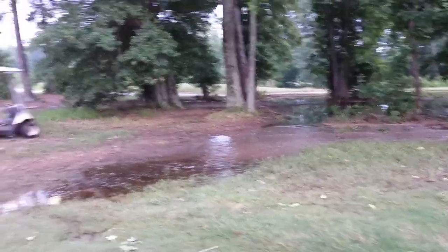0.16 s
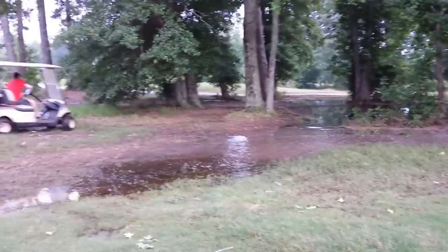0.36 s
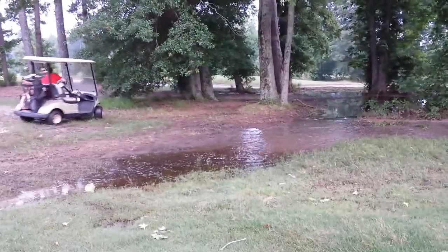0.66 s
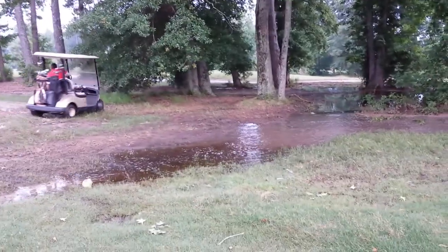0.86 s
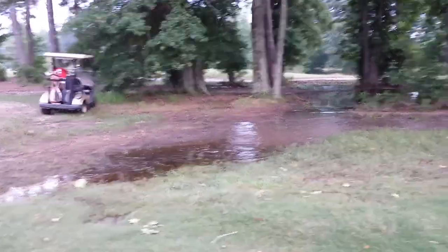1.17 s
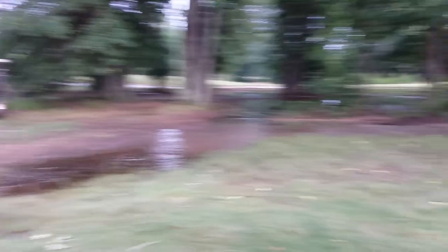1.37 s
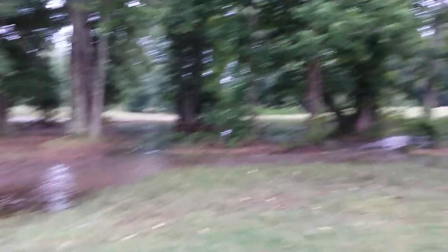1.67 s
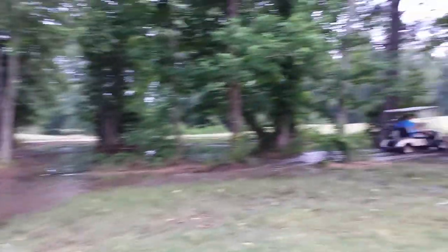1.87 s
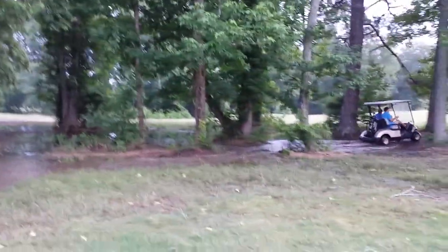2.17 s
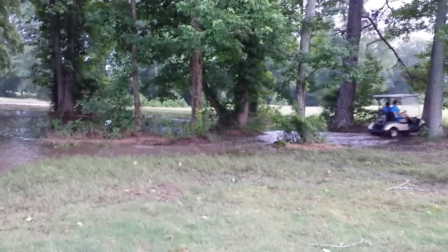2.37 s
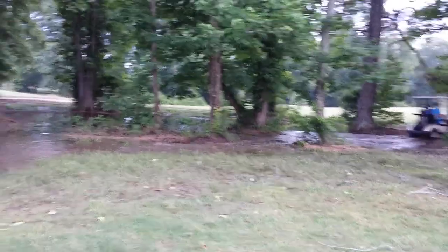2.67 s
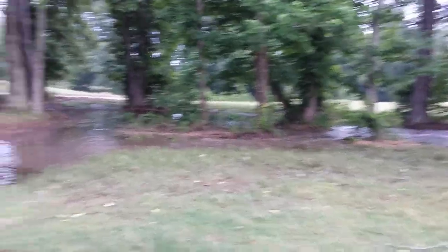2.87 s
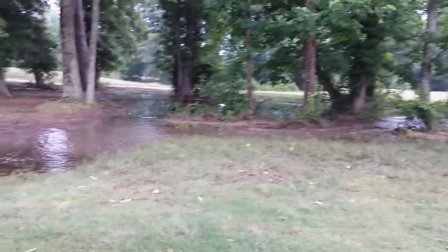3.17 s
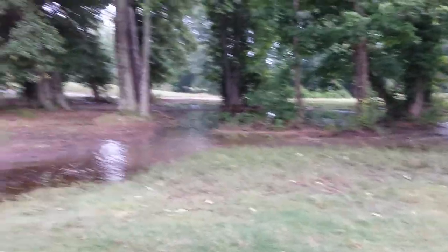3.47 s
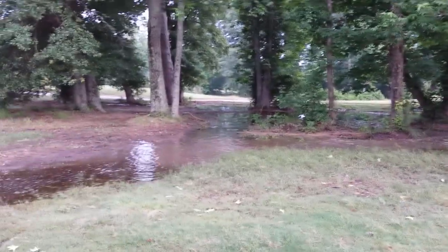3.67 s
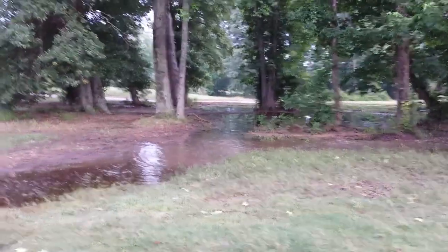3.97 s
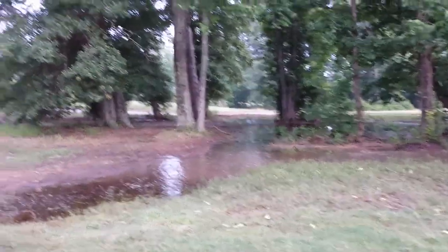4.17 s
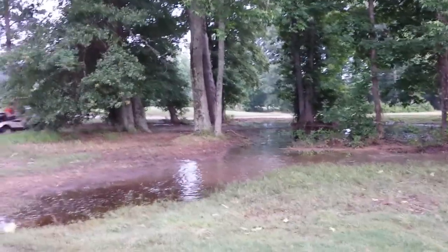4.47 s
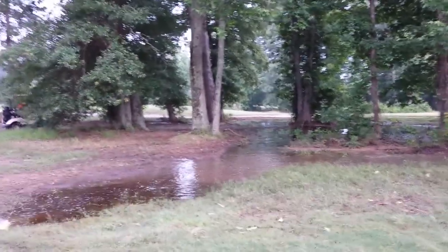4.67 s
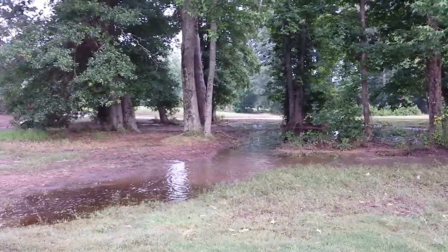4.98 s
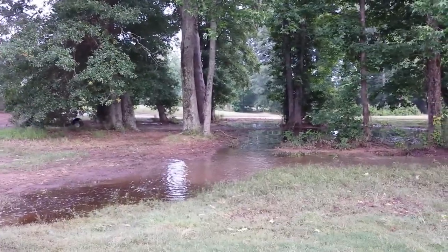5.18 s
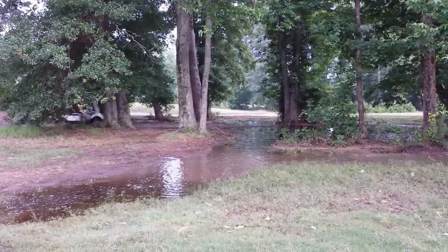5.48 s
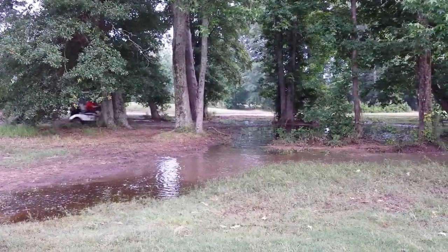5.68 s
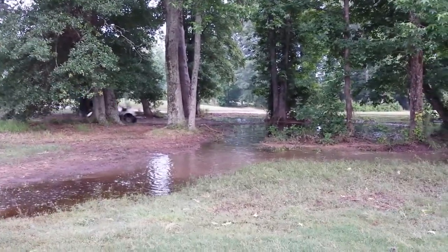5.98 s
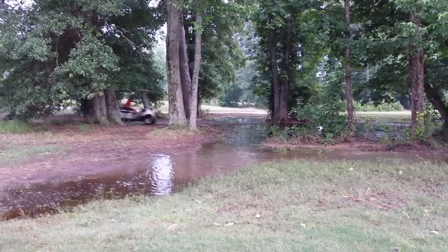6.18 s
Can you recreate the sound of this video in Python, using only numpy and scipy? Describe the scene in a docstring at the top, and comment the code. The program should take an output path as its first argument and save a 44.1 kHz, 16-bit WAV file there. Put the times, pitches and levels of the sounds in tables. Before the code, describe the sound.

Outdoors among trees, a small single-cylinder petrol cart putters at about twenty beats a second, swelling and easing as the pedal is pressed and released. Its loose cover rattles around one to two seconds. A second, more distant cart chugs and briefly whines behind it. Wet hiss runs throughout, stronger at first, with a slosh of water near two seconds. Close to the handheld stereo microphone come bright ticks, dry rustles and tiny drops.

```python
"""Two petrol carts on wet ground

Two golf carts drive among trees, heard across a puddle; each single-cylinder engine fires about
twenty times a second. Firing pulses and gas noise excite body resonances; noise tails scatter the beats.
Filtered noise makes the wet hiss and wash; short bursts and decaying tones make ticks, rustles, drops
and a clink. Two microphone ports colour the treble differently."""
import sys
import numpy as np
from scipy import signal
from scipy.fft import rfft, irfft
from scipy.io import wavfile
from scipy.ndimage import uniform_filter1d, map_coordinates

SR = 44100
rng = np.random.default_rng(int(sys.argv[2]) if len(sys.argv) > 2 else 0)


def dump(signal):
    """Clip the signal to [-1, 1] and save it as 16-bit WAV at the path in sys.argv[1]."""
    limited = np.clip(np.atleast_2d(signal).T, -1, 1)
    pcm = np.round(limited * 32767).astype(np.int16)
    wavfile.write(sys.argv[1], SR, pcm)


N = 279153
T = np.arange(N) / SR
FREQ_HZ = np.maximum(np.arange(N // 2 + 1) * SR / N, 1)

# Levels are set ahead of the ports; resonance widths are nominal.
# first cart: (time [s], firing rate [Hz])
FIRING_NEAR = [(0.0, 20.92), (0.75, 16.99), (1.15, 20.61), (1.9, 23.45), (3.3, 16.79), (4.7, 21.83),
               (5.45, 24.52), (5.75, 20.9), (6.33, 25.47)]
# first cart's pedal presses: (start [s], length [s], release [s], lowest putt pitch [Hz],
#  bark drive [dB], rasp drive [dB], whine drive [dB])
PEDAL_PRESSES = [(-.3, 0.47, 0.12, 242, -29, -37, -44), (0.38, 1.36, 0.17, 230, -25.5, -32.5, -42.5),
                 (1.987, 0.75, 0.19, 315, -56, -39.5, -46), (2.835, 0.29, .08, 227, -31, -46, -59),
                 (3.535, 0.597, 0.062, 230, -34.5, -37.5, -47),
                 (4.358, 1.19, 0.023, 263.7, -31.5, -46, -48), (5.93, .5, .17, 228, -46, -46, -68)]
# pedal up: (bark drive [dB], rasp drive [dB], whine drive [dB])
IDLE_DRIVE_DB = (-41.5, -47.5, -75)
# silencer and body resonances: (centre [Hz], width [Hz], relative level [dB])
SILENCER_NEAR = [(41.6, 5.2, -8), (100, 27, -5), (110.7, 30, -2.5), (190, 26, -2), (226.5, 59, 4.5),
                 (277, 56, 4.5)]
# engine bay resonances: (centre [Hz], width [Hz], relative level [dB])
BAY_NEAR = [(485, 250, -7), (629, 75, 5), (797, 103, 5), (874, 96, 9), (1140, 390, -5), (1424, 24, -2),
            (1557, 120, 0), (2700, 690, -25)]
# rasp drift of both carts as they turn and move: (time [s], frequency ratio [1])
RASP_RATIO = [(0, 1), (1.6, 0.96), (2.7, 0.98), (4.2, .97), (6.33, 0.82)]
# engine cover resonances: (centre [Hz], width [Hz], relative level [dB])
COVER_MODES = [(2183, 46, 20.5), (2330, 130, -25), (2500, 86, -10)]
# cover's lower knock on each stroke: (centre [Hz], width [Hz], relative level [dB])
COVER_KNOCK_MODES = [(610, 150, 0), (850, 200, 1), (1170, 100, -8), (1400, 150, -4)]
# cover rattles under load: (start [s], length [s], level [dB])
COVER_RATTLES = [(.88, .35, -45), (1.08, .53, -33), (1.51, .45, -35)]
# first cart's early panel knocks: (time [s], onset level [dB])
PANEL_KNOCKS = [(0.569, -33), (0.63, -30), (0.914, -29), (.965, -32)]
# panel shaken by the engine: (centre [Hz], width [Hz], relative level [dB])
PANEL_MODES = [(1415, 85, 5.5), (1610, 180, -23), (2170, 86, -2.5)]
# second cart: (time [s], mean firing rate [Hz])
FIRING_DISTANT = [(0, 16.5), (2.0, 25.8), (2.7, 22.3), (3.4, 24.9), (6.33, 21.4)]
# second cart in the wood: (time [s], bark [dB], boom [dB], rasp [dB], pipe drone [dB])
LEVELS_DISTANT = [(0, -36, -33.5, -29, -40), (.4, -31, -36, -32.5, -32), (1.4, -28.5, -35.5, -35, -34.5),
                  (2.1, -34, -38, -31, -31.5), (2.45, -33.5, -41, -33, -35.5),
                  (3.05, -30, -32.5, -34.5, -35.5), (3.4, -34.5, -34, -37, -41),
                  (4.4, -33.5, -38, -38, -47), (5.2, -32.5, -41.5, -42, -45.5),
                  (5.8, -38, -39, -46.5, -48.5), (6.33, -31, -38, -38, -50)]
# second silencer and body resonances: (centre [Hz], width [Hz], relative level [dB])
SILENCER_DISTANT = [(47, 10, -9), (92.8, 26.6, 0), (141.4, 17.6, 4), (219.7, 63, 4.5), (266.8, 78, -0.5),
                    (364.7, 36, -7.5)]
# second engine bay resonances: (centre [Hz], width [Hz], relative level [dB])
BAY_DISTANT = [(579, 214, -2.5), (646, 133, -4.5), (755, 136, -11), (950, 65, 0), (1297, 334, -9.5),
               (1432, 240, -9.5), (2360, 450, -10.5), (2720, 150, -6)]
# second tailpipe drone: (centre [Hz], width [Hz], relative level [dB])
TAILPIPE_DISTANT = [(298, 45, -4), (332, 30, 0), (378, 30, -11)]
# second cart's drive whine: (time [s], mean pitch [Hz], level [dB])
WHINE_DISTANT = [(2.15, 880, -75), (2.3, 885, -44), (2.6, 905, -42), (2.75, 1000, -39.5), (2.85, 990, -46),
                 (3.15, 1005, -47), (3.35, 960, -80)]
# thin squeaks: (start [s], length [s], mean pitch [Hz], level [dB])
SQUEAK_TONES = [(3.95, .17, 2815, -43.5), (3.955, .05, 6380, -38), (4.32, .09, 6390, -42),
                (4.49, .14, 6400, -37)]
# close ticks, like drops and twigs: (time [s], peak [dB], ring [Hz], bright snap re ring [dB])
TICK_EVENTS = [(.064, -18, 6250, -6), (.106, -14, 4040, -16), (.225, -7.5, 5750, -24),
               (.324, -11, 5700, -28), (.453, -14, 6800, -12), (1.592, -16.5, 5445, -20),
               (2.081, -22, 4300, -8), (2.547, -13.5, 7000, 7), (2.591, -12, 7000, 4),
               (2.759, -17, 7500, -3), (2.777, -18, 7600, -4), (2.845, -17, 5300, -14),
               (2.98, -16, 6000, 3), (3.111, -11, 6500, -4), (3.168, -13, 7040, 2), (3.182, -10, 6500, 5),
               (3.296, -15, 5250, -2), (3.384, -18, 5600, 4), (3.403, -19, 6500, 4),
               (3.434, -21, 5800, -20), (3.443, -19, 4600, -10), (3.696, -14, 5400, 5),
               (3.851, -14.5, 6300, 4), (4.655, -18, 7000, 3), (4.968, -10.5, 9000, -1),
               (5.51, -18, 6600, 2), (5.88, -19, 6400, -1), (6.112, -20, 6500, 2)]
# close crackling rustles: (time [s], peak [dB])
RUSTLE_EVENTS = [(1.772, -10), (1.8, -13), (1.895, -13), (2.152, -13), (2.733, -17), (3.705, -18),
                 (4.04, -18.5), (4.297, -16), (4.5, -17), (4.976, -12), (5.514, -21)]
# drops with a thin pitched tail: (time [s], peak [dB], pitch [Hz])
PLINK_EVENTS = [(.232, -19, 5840), (.327, -17.5, 4730), (3.3, -18.5, 4850)]
# metallic clink modes: (pitch [Hz], relative level [dB], T60 [s])
CLINK_MODES = [(4424, 0, .1), (4974, -21, .1), (6282, -22, .15)]
# wet ground under the tyres: (time [s], hiss before gain [dB], spray before gain [dB])
WET_LEVELS = [(0.0, -28, -40), (0.39, -27, -37.5), (0.58, -27, -35), (1.66, -25.5, -36), (1.97, -28, -34),
              (2.27, -33.5, -40.5), (3.01, -32, -43), (3.45, -35.5, -50), (3.98, -32.5, -44),
              (5.08, -35, -51.5), (5.4, -32.5, -51), (5.73, -37.5, -54), (6.33, -31, -46)]
# wet hiss spectrum: (frequency [Hz], relative level [dB])
HISS_COLOUR = [(100, -2.5), (900, 1), (1800, -4), (3000, 3), (4500, 1.5), (7000, 3), (9000, -4),
               (11000, -25.5), (15000, -5)]
# microphone port responses: (frequency [Hz], left [dB], right [dB])
PORT_RESPONSE = [(1460, 0, -0.5), (2110, 3.5, -0.5), (3080, -2.5, -3.5), (4100, 3, -2), (5330, 10.5, -1),
                 (6100, 10.5, -11), (6220, 12, -7.5), (7030, 5, -10.5), (7860, 1, -1.5), (10300, 0, 2.5),
                 (12200, -9, -1), (13500, -31, -9.5), (14800, -47, -37)]

ATTACK_S = 0.34  # engine takes up load
BOOM_DB, BOOM_PER_BARK_DB = -22, 0.46  # boom = base + share of the bark drive
BROAD_BARK_DB = -8.5  # re bark drive
CHAMBER_HZ, CHAMBER_SAG_S, CHAMBER_BUILD_DB = 360, .8, 2
CHAMBER_DB, PUTT_PEAK_S = -1, .0085  # chamber level re bark drive
WHINE_HZ, WHINE_WIDTH_HZ = 1396, 40
WHINE_ATTACK_S, WHINE_RELEASE_S = 0.18, 0.17  # drive runs on as the cart coasts
RATTLE_BASE_HZ, RATTLE_HZ_PER_FIRING_HZ, RATTLE_WANDER_RATIO = 1020, 55, .02
RATTLE_FADE_S, RATTLE_SCATTER_DB, COVER_KNOCK_DB = .11, 1.6, -7.5
BOUNCE_S, BOUNCE_DB, BOUNCE_SCATTER_DB = .012, -8, 4  # cover's second ring
FAR_HUNT_RATIO = .025  # second engine's governor hunts
SQUEAK_WAVER_RATIO = .005
TICK_WIDTH_HZ, TICK_T60_S, SNAP_T60_S = 900, .022, .008
TICK_TAIL_DB, TICK_TAIL_T60_S = -32, 0.63
RUSTLE_HZ, RUSTLE_WIDTH_HZ, RUSTLE_BRIGHT_DB, RUSTLE_T60_S = 6870, 2500, -1, 0.42
CRACKLES_PER_S, CRACKLE_T60_S, CRACKLE_BED = 220, .008, .22
PLINK_WIDTH_HZ, PLINK_T60_S = 220, .12
CLINK_S, CLINK_DB = 2.082, -16
DROPS_PER_S, DROP_DB, DROP_SCATTER_DB, DROP_T60_S = 22, -42, 3.5, .011
HISS_GAIN_DB, SPRAY_GAIN_DB = -0.36, 4
WASH_S, WASH_LENGTH_S, WASH_FADE_S, WASH_DB = 1.71, 1.67, 0.25, -41
WASH_HZ, WASH_WIDTH_HZ, WASH_GURGLE_DB = 2920, 1100, 2.3
TOP_HZ = 14800


def first_cart():
    """Firings thump the silencer, gas rasps in the engine bay, the drive whines and the cover rattles."""
    firing_hz, = curves(FIRING_NEAR)
    bark_db, rasp_db, whine_db = pedal_levels()
    boom_db = BOOM_DB + BOOM_PER_BARK_DB * bark_db
    pulses, age_s, size = firings(firing_hz, scatter_db=.8, jitter_cycles=.008)
    gas = size * puff(age_s, decay_s=.016, leak=.3)
    # a weaker gulp of air half a cycle later
    intake = np.diff(1.0 * (age_s * firing_hz > .5), prepend=0).clip(0)
    thump = unit(ring(pulses + .3 * intake, SILENCER_NEAR))
    thump = thump + .5 * unit(ring(gas, SILENCER_NEAR))
    flow = stroke(age_s, rise_s=.004, decay_s=.014, leak=.16)
    rasp = gas_rasp(BAY_NEAR, size * flow)
    whine = unit(ring(puff(age_s, decay_s=.015, leak=.9), [(WHINE_HZ, WHINE_WIDTH_HZ, 0)]))
    chug = exhaust(thump, bark_db + BROAD_BARK_DB, boom_db)
    putt = chamber(age_s, size) * undb(bark_db + CHAMBER_DB)
    body = chug + putt + rasp * undb(rasp_db) + whine * undb(whine_db)
    cover = cover_rattle(age_s, firing_hz)
    body_heard = among_trees(body, lag_ms=.17, scatter_db=-13, t60_s=.35)
    return body_heard + among_trees(cover, lag_ms=.17, scatter_db=-16, t60_s=.15)


def pedal_levels():
    """Bark, rasp and whine drive [dB]: press powers add to idle power."""
    power = undb(IDLE_DRIVE_DB)[:, None] ** 2 * np.ones(N)
    for start_s, length_s, release_s, _, *drive_db in PEDAL_PRESSES:
        load = press(start_s, length_s, ATTACK_S, release_s)
        roll = press(start_s, length_s, WHINE_ATTACK_S, WHINE_RELEASE_S)
        power = power + (undb(drive_db)[:, None] * np.array([load, load, roll])) ** 2
    return 10 * np.log10(power)


def press(start_s, length_s, attack_s, release_s):
    """Load builds exponentially from the press and dies away after release."""
    build = 1 - np.exp(-np.maximum(T - start_s, 0) / attack_s)
    return build * np.exp(-np.maximum(T - start_s - length_s, 0) / release_s)


def chamber(age_s, size):
    """Each firing rings the silencer chamber in one putt, lower and fuller with time since the press."""
    starts_s, _, _, lowest_hz, *_ = np.transpose(PEDAL_PRESSES)
    latest = np.searchsorted(starts_s, T) - 1
    load = np.minimum((T - starts_s[latest]) / CHAMBER_SAG_S, 1)
    hz = CHAMBER_HZ + (lowest_hz[latest] - CHAMBER_HZ) * load
    hz = hz * (1 + .05 * walk(22))
    rise = age_s / PUTT_PEAK_S
    build_db = CHAMBER_BUILD_DB * load + .8 * walk(20)
    flow = size * undb(build_db) * (rise * np.exp(-rise)) ** 2
    return unit(flow * np.sin(2 * np.pi * hz * age_s + .45 * walk(25)))


def cover_rattle(age_s, firing_hz):
    """The loose cover clacks just before each beat and bounces; its pitch climbs with engine speed."""
    hz = RATTLE_BASE_HZ + RATTLE_HZ_PER_FIRING_HZ * firing_hz
    hz = hz * (1 + RATTLE_WANDER_RATIO * walk(15))
    clack_age_s = (age_s + .0065) % (1 / firing_hz)
    bounce = cover_clack(clack_age_s - BOUNCE_S, hz) * undb(BOUNCE_DB + BOUNCE_SCATTER_DB * walk(22))
    clack = cover_clack(clack_age_s, hz) + bounce
    buzz = ring(puff(clack_age_s, decay_s=.005, leak=.1), COVER_MODES)
    clatter = unit(clack) + .4 * unit(buzz)
    knock = unit(ring(puff(clack_age_s, decay_s=.008, leak=.05), COVER_KNOCK_MODES))
    shake = sum(undb(db) * swell(s, length_s, RATTLE_FADE_S) for s, length_s, db in COVER_RATTLES)
    mix = unit(clatter) + undb(COVER_KNOCK_DB) * knock
    return mix * shake * undb(RATTLE_SCATTER_DB * walk(17.9))


def cover_clack(age_s, hz):
    """One short damped sine of the cover."""
    age_s = np.maximum(age_s, 0)
    return np.sin(2 * np.pi * hz * age_s) * np.exp(-age_s / .0035) * (1 - np.exp(-age_s / .0015))


def panel_knocks():
    """A loose panel buzzes briefly a few times early on: resonant noise under exponential decays."""
    shake = sum(undb(db) * (T > s) * np.exp(-np.abs(T - s) / 0.017) for s, db in PANEL_KNOCKS)
    buzz = unit(ring(rng.standard_normal(N), PANEL_MODES))
    return among_trees(shake * buzz, lag_ms=0.073, scatter_db=-18, t60_s=.25)


def second_cart():
    """A more distant engine to the other side, its beats smeared by stronger scatter."""
    firing_hz = curves(FIRING_DISTANT)[0] * (1 + FAR_HUNT_RATIO * walk(3))
    bark_db, boom_db, rasp_db, drone_db = curves(LEVELS_DISTANT)
    pulses, age_s, size = firings(firing_hz, scatter_db=.9, jitter_cycles=.04)
    gas = size * puff(age_s, decay_s=0.44, leak=1.0)
    thump = unit(ring(pulses, SILENCER_DISTANT))
    thump = thump + undb(2.5) * unit(ring(gas, SILENCER_DISTANT))
    flow = stroke(age_s, rise_s=0.0072, decay_s=0.056, leak=0.49)
    rasp = gas_rasp(BAY_DISTANT, size * flow)
    drone = unit(ring(size * puff(age_s, decay_s=.012, leak=.15), TAILPIPE_DISTANT))
    chug = exhaust(thump, bark_db, boom_db)
    body = chug + rasp * undb(rasp_db) + drone * undb(drone_db) + far_whine()
    return among_trees(body, lag_ms=-0.21, scatter_db=-7.5, t60_s=0.41)


def far_whine():
    """Drive whine as the cart speeds up: a sine roughened in pitch and level."""
    hz, db = curves(WHINE_DISTANT)
    phase = 2 * np.pi * np.cumsum(hz * (1 + .018 * walk(70))) / SR
    return unit(np.sin(phase) * (1 + .5 * walk(60))) * undb(db)


def firings(firing_hz, scatter_db, jitter_cycles):
    """A pressure pulse per firing, with the current stroke's age [s] and strength."""
    turns = np.cumsum(firing_hz) / SR + jitter_cycles * walk(12)
    cycle = turns.astype(int)
    size = undb(scatter_db * rng.standard_normal(400))[cycle]
    return np.diff(cycle, prepend=0) * size, turns % 1 / firing_hz, size


def puff(age_s, decay_s, leak):
    """Gas noise bursts out at each stroke and dies down to a steady leak."""
    return unit((np.exp(-age_s / decay_s) + leak) * rng.standard_normal(N))


def stroke(age_s, rise_s, decay_s, leak):
    """Gas flow over one stroke: a quick rise, a decay and a steady leak."""
    return (1 - np.exp(-age_s / rise_s)) * np.exp(-age_s / decay_s) + leak


def gas_rasp(modes, envelope):
    """Rushing gas in drifting resonances (resampled noise), chopped by the strokes."""
    ratio, = curves(RASP_RATIO)
    rush = ring(rng.standard_normal(N + N // 4), modes)
    drifting = map_coordinates(rush, [np.cumsum(ratio)], order=3)
    return unit(envelope * drifting)


def exhaust(thump, bark_db, boom_db):
    """Split the thump near 163 Hz into low boom and bark, each with its own level curve."""
    lowpass = signal.butter(4, 163, fs=SR, output="sos")
    boom = signal.sosfiltfilt(lowpass, thump)
    return unit(boom) * undb(boom_db) + unit(thump - boom) * undb(bark_db)


def among_trees(x, lag_ms, scatter_db, t60_s):
    """Direct sound reaches one port later; trunks scatter it back as decaying noise tails."""
    t = T[:SR // 2]
    tails = rng.standard_normal((2, len(t))) * undb(-60 * t / t60_s) * (t > .008)
    mid, side = (signal.fftconvolve(x, unit(tail) / np.sqrt(len(t)))[:N] for tail in tails)
    # long waves reach both ports alike
    side = colour(side, [100, 300, 600, 1100], [-26, -6.5, -15, -20.0])
    direct = np.array([np.interp(T - sign * lag_ms / 2000, T, x) for sign in (1, -1)])
    scattered = np.array([mid + side, mid - side])
    return unit(direct + undb(scatter_db) * scattered) * np.std(x)


def squeak():
    """Brief thin squeaks: wavering sines under smooth swells."""
    out = np.zeros(N)
    for start_s, length_s, hz, db in SQUEAK_TONES:
        wavering_hz = hz * (1 + SQUEAK_WAVER_RATIO * walk(250))
        tone = np.sin(2 * np.pi * np.cumsum(wavering_hz) / SR)
        out = out + unit(tone) * undb(db) * swell(start_s, length_s, length_s / 2)
    return among_trees(out, lag_ms=.02, scatter_db=-10, t60_s=0.31)


def ticks():
    """Each tick is a bright snap and a short gritty ring with a faint tail."""
    out = np.zeros((2, N))
    t = T[:SR // 4]
    fade = undb(-60 * t / TICK_T60_S) + undb(TICK_TAIL_DB - 60 * t / TICK_TAIL_T60_S)
    for s, db, hz, snap_db in TICK_EVENTS:
        snap, grit = rng.standard_normal((2, 2, len(t)))
        gritty_ring = unit(ring(grit, [(hz, TICK_WIDTH_HZ, 0)])) * fade
        add(out, s, db, gritty_ring + snap * undb(snap_db - 60 * t / SNAP_T60_S))
    return out


def rustles():
    """Each rustle is a fading cluster of tiny bright crackles."""
    out = np.zeros((2, N))
    t = T[:SR // 4]
    for s, db in RUSTLE_EVENTS:
        fizz, grit = rng.standard_normal((2, 2, len(t)))
        cracks = (rng.random(len(t)) < CRACKLES_PER_S / SR) * rng.random(len(t))
        grains = CRACKLE_BED + signal.lfilter([1], [1, -undb(-60 / (CRACKLE_T60_S * SR))], cracks)
        body = unit(ring(grit, [(RUSTLE_HZ, RUSTLE_WIDTH_HZ, 0)])) + undb(RUSTLE_BRIGHT_DB) * fizz
        add(out, s, db, body * grains * undb(-60 * t / RUSTLE_T60_S))
    return out


def plinks():
    """Each drop rings briefly on one pitch: narrow-band noise with a decay."""
    out = np.zeros((2, N))
    t = T[:SR // 4]
    for s, db, hz in PLINK_EVENTS:
        tone = ring(rng.standard_normal((2, 2 * len(t))), [(hz, PLINK_WIDTH_HZ, 0)])
        settled = tone[:, len(t):]
        add(out, s, db, settled * undb(-60 * t / PLINK_T60_S))
    return out


def clink():
    """A small piece of metal rings briefly: decaying sine modes."""
    age_s = np.maximum(T - CLINK_S, 0)
    modes = (undb(db - 60 * age_s / t60_s) * np.sin(2 * np.pi * hz * age_s) for hz, db, t60_s in CLINK_MODES)
    return undb(CLINK_DB) * sum(modes)


def drops():
    """Stray drops: faint bright noise clicks at random moments."""
    scatter = undb(DROP_SCATTER_DB * np.minimum(rng.exponential(size=N), 3))
    hits = (rng.random(N) < DROPS_PER_S / SR) * scatter
    fade = signal.lfilter([1], [1, -undb(-60 / (DROP_T60_S * SR))], hits)
    return undb(DROP_DB) * fade * unit(ring(rng.standard_normal((2, N)), [(9500, 2600, 0)]))


def wash():
    """Water sloshes off the second cart's wheels: band noise with a gurgling level."""
    slosh = ring(rng.standard_normal((2, N)), [(WASH_HZ, WASH_WIDTH_HZ, 0)])
    slosh = slosh * undb(WASH_GURGLE_DB * walk(70))
    return unit(slosh) * undb(WASH_DB) * swell(WASH_S, WASH_LENGTH_S, WASH_FADE_S)


def wet_ground():
    """Fine hiss with a scatter of tiny bursts, and brighter spray on top."""
    hiss_db, spray_db = curves(WET_LEVELS)
    bursts = (rng.random(N) < 260 / SR) * undb(6 * np.minimum(rng.exponential(size=N), 2.5))
    bursts = unit(signal.lfilter([1], [1, -np.exp(-1 / (0.0051 * SR))], bursts))
    flutter = undb(.9 * walk(18))
    hiss = colour(rng.standard_normal((2, N)) * (1 + 0.33 * bursts), *np.transpose(HISS_COLOUR))
    spray = ring(rng.standard_normal((2, N)) * (1 + 0.23 * bursts), [(12000, 9200, 0)])
    hiss = unit(hiss) * undb(hiss_db + HISS_GAIN_DB)
    spray = unit(spray) * undb(spray_db + SPRAY_GAIN_DB)
    return flutter * (hiss + spray)


def undb(db):
    """Decibels to gain."""
    return 10 ** (np.asarray(db) / 20)


def unit(x):
    """Scale to rms 1."""
    return x / np.sqrt(np.mean(x ** 2))


def curves(table):
    """Each column of a table as a curve over time."""
    s, *columns = np.transpose(table)
    return [np.interp(T, s, column) for column in columns]


def walk(rate_hz):
    """Slow random drift with a spread near 1: held noise, smoothed twice."""
    k = int(SR / rate_hz)
    held = np.repeat(rng.standard_normal(N // k + 1), k)
    return unit(uniform_filter1d(uniform_filter1d(held, k), k))[:N]


def swell(start_s, length_s, fade_s):
    """A smooth rise, a hold and a fall."""
    edge_s = np.minimum(T - start_s, start_s + length_s - T)
    return np.sin(np.pi / 2 * np.clip(edge_s / fade_s, 0, 1))


def add(out, start_s, peak_db, sound):
    """Mix a short sound in at a time and a peak level."""
    start = int(start_s * SR)
    out[:, start:start + sound.shape[1]] += undb(peak_db) * sound[:, :N - start] / np.abs(sound).max()


def colour(x, hz, db):
    """Causal minimum-phase filter through (Hz, dB) points, by folding the cepstrum."""
    cepstrum = irfft(np.log(undb(np.interp(np.log(FREQ_HZ), np.log(hz), db))), N)
    cepstrum[1:N // 2] *= 2
    cepstrum[N // 2:] = 0
    return irfft(rfft(x) * np.exp(rfft(cepstrum)), N)


def band(x, hz, width_hz):
    """One resonance, gain 1 at its centre."""
    return signal.lfilter(*signal.iirpeak(min(hz, .45 * SR), hz / width_hz, fs=SR), x)


def ring(x, modes):
    """Sum of steep-sided resonances, each two widened bands in series."""
    return sum(undb(db) * band(band(x, hz, 1.36 * width_hz), hz, 1.36 * width_hz)
               for hz, width_hz, db in modes)


def scene():
    """Two carts, the wet ground under them and small sounds close by."""
    carts = first_cart() + second_cart() + squeak() + panel_knocks()
    close = ticks() + rustles() + plinks() + clink()
    return carts + close + drops() + wash() + wet_ground()


def record(dry):
    """The left port peaks near 6 kHz, where the right one dips; the top is cut."""
    hz, *ports_db = np.transpose(PORT_RESPONSE)
    heard = np.array([colour(x, hz, db) for x, db in zip(dry, ports_db)])
    top_cut = signal.ellip(8, .2, 70, TOP_HZ, fs=SR, output="sos")
    return signal.sosfilt(top_cut, np.clip(heard, -1, 1))


dry = scene()
out = record(dry)
dump(out)
```